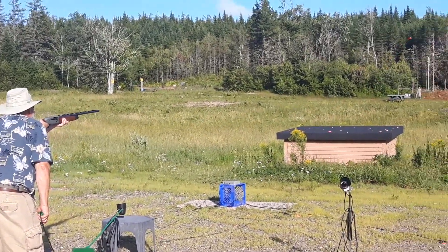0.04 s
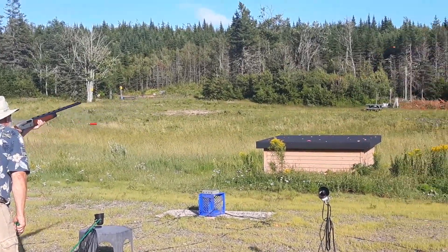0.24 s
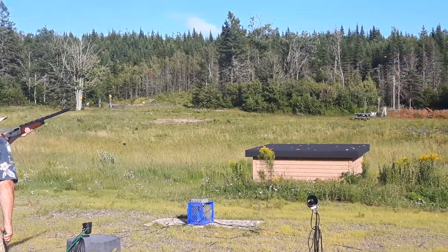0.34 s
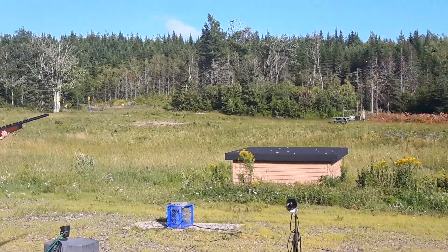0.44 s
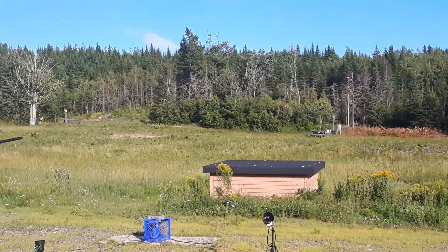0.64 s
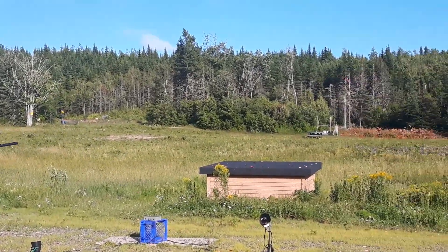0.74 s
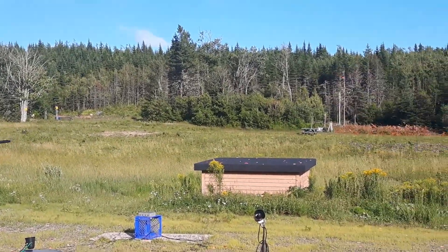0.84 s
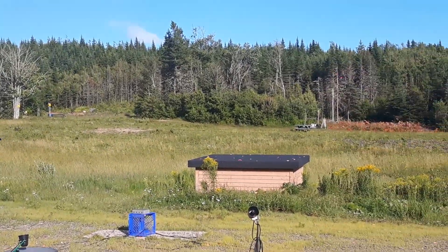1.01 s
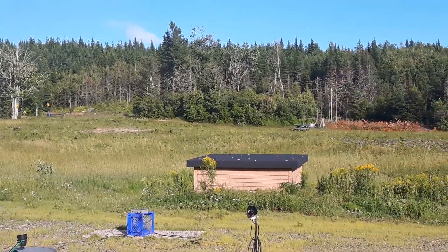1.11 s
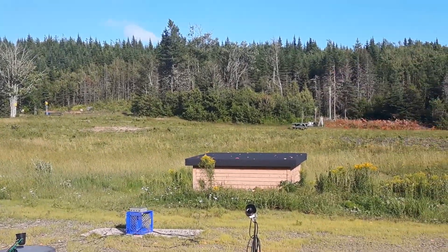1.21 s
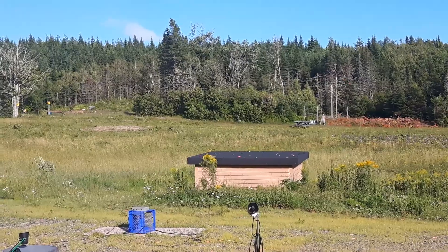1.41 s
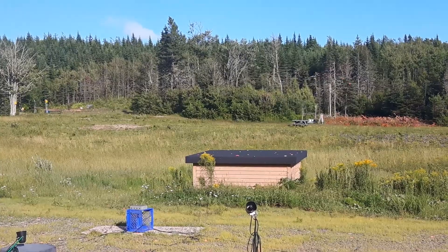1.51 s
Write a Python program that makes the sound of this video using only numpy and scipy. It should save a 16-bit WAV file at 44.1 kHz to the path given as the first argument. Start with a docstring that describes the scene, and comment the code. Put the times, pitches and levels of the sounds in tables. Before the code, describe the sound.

One sharp shotgun shot cracks across an open range and echoes off the forest.

```python
"""Shotgun on an open range

One shot, heard from a few steps behind the shooter. The blast overloads the microphone.
Hard slaps and scattered echoes bounce back from the ground and nearby structures.
Then the forest edge returns a long rolling echo that grows duller, over a faint low hum."""
import sys
import numpy as np
from scipy import signal
from scipy.fft import rfft, irfft, next_fast_len
from scipy.io import wavfile

SR = 44100
rng = np.random.default_rng(int(sys.argv[2]) if len(sys.argv) > 2 else 0)


def generate_wav(sig):
    """Save sig (samples, or channels by samples) to the path in sys.argv[1] as 16-bit PCM at SR."""
    pcm = np.round(np.clip(np.atleast_2d(sig).T, -1, 1) * 32767).astype(np.int16)
    wavfile.write(sys.argv[1], SR, pcm)


N = 68355
T = np.arange(N) / SR
SHOT_S, ATTACK_S = 0.233, 0.00039


def from_db(db):
    """Turn decibels into a number to multiply by."""
    return 10 ** (np.asarray(db) / 20)


def unit_level(x):
    """Scale a signal to an average power of 1."""
    return x / np.sqrt(np.mean(x ** 2) + 1e-20)


def colour(x, points):
    """Filter a sound to follow (f/Hz, level/dB) points; only the gaps between the levels count."""
    size = 2 * next_fast_len(N)
    hz, db = np.transpose(points)
    grid_hz = np.linspace(1, SR / 2, size // 2 + 1)
    gain = unit_level(from_db(np.interp(np.log(grid_hz), np.log(hz), db)))
    # make the filter ring only after a sound, never before it
    cepstrum = irfft(np.log(gain))
    cepstrum[1:size // 2] *= 2
    cepstrum[size // 2 + 1:] = 0
    return irfft(rfft(x, size) * np.exp(rfft(cepstrum)))[:N]


def keep_side(x, hz, side):
    """Keep the "low" or "high" side of a sound."""
    return signal.sosfilt(signal.butter(2, hz, side, fs=SR, output="sos"), x)


def drift(rate_hz):
    """A slow random wobble, about 1 in size."""
    return unit_level(keep_side(rng.standard_normal(2 * N), rate_hz, "low")[N:])


def echoes(per_s, spread_db=1.5):
    """Many tiny echoes of uneven strength, at random times."""
    sizes = from_db(spread_db * np.minimum(rng.exponential(1, N), 4))
    signs = rng.choice([-1, 1], N)
    return unit_level(sizes * signs * (rng.random(N) < per_s / SR))


def die_away(x, start_s, fall_db_per_s, air_db_per_s_khz):
    """Later echoes have gone further: they are weaker, and the air has soaked up their treble."""
    hz, s, frames = signal.stft(x, SR, nperseg=512)
    khz = hz[:, None] / 1000
    loss_db = (fall_db_per_s + air_db_per_s_khz * khz) * np.maximum(s - start_s, 0)
    loss_db += 5.5 * khz * np.maximum(s - 1.09, 0)   # faster once the deepest trees have answered
    return signal.istft(frames * from_db(-loss_db), SR)[1][:N]


# tone of the outdoor air: f/Hz, level/dB
AIR_TONE = [(25, -23.5), (60, -11.5), (90, -7.5), (130, 4.5), (180, -13), (370, -16.5), (480, -29.5),
            (800, -30.5), (1300, -36), (2450, -36), (2900, -54), (4800, -54.5), (6000, -62), (15000, -64)]


def background(hum_hz=119, hum_db=-43.5, air_db=-43, dip_db=15, return_db_per_s=5):
    """Outdoor rumble and a wavering hum; both drop at the shot and creep back."""
    phase = 2 * np.pi * np.cumsum(hum_hz + 2 * drift(5.4)) / SR
    hum = unit_level(np.sin(phase) * from_db(0.5 * drift(10)))
    air = colour(rng.standard_normal(N), AIR_TONE)
    age = T - SHOT_S
    dip = from_db((age > 0) * (return_db_per_s * age - dip_db))
    return dip * (from_db(hum_db) * hum + from_db(air_db) * air)


def shock_train(fronts, envelope):
    """A burst of ragged pressure jumps, evened out to hold every frequency alike."""
    burst = fronts * envelope
    for _ in range(4):
        spectrum = rfft(burst)
        burst = irfft(spectrum / (np.abs(spectrum) + 1e-12), len(burst)) * np.sqrt(envelope)
    return burst


# the blast and its hard echoes: t/s, length/s, level/dB, extra low roar/dB, extra high fizz/dB
CRACK_ARRIVALS = [(0.233, 0.0058, -4, 0.5, -3), (0.2397, 0.0093, -19, 3, 7.5), (0.2549, 0.006, -11.5, 7, 0),
                  (0.274, 0.02, -28, 11, 8), (0.3039, 0.0026, -8, -1, -3), (0.3175, 0.012, -24, 2, -12),
                  (0.3426, .0042, -15, -10.5, -2.5), (.3550, 0.011, -29.5, -17.5, -8),
                  (0.435, 0.0089, -37, -23, -6), (0.448, 0.013, -35, -14, -10),
                  (0.468, 0.011, -37.5, -37, -23), (0.667, 0.0025, -36.5, -8, -17),
                  (0.7012, 0.013, -41, 15, -38)]
# tone of the crack: f/Hz, level/dB
CRACK_TONE = [(35, -28), (150, -8.5), (420, -6), (560, -1), (740, 1.5), (880, -7), (1120, -3.5),
              (1500, -12.5), (2150, -4.5), (2290, -1.5), (2480, -3), (2850, -25), (3600, -16.5),
              (4700, -18), (5600, -31.5), (7200, -30), (9500, -24.5), (11500, -32), (14500, -19.5)]


def cracks(release_s=0.0019, roar_hz=900, fizz_hz=5630):
    """The blast and its echoes repeat one shock, each in its own tone; together they sound hollow."""
    out, age = np.zeros(N), T[:SR // 10]
    fronts = rng.standard_normal(len(age))
    hz, base_db = np.transpose(CRACK_TONE)
    for s, length, db, roar_db, fizz_db in CRACK_ARRIVALS:
        tone_db = base_db + roar_db / (1 + (hz / roar_hz) ** 4) + fizz_db / (1 + (fizz_hz / hz) ** 4)
        envelope = np.minimum(age / ATTACK_S, 1) * np.exp(-np.maximum(age - length, 0) / release_s)
        burst = unit_level(colour(shock_train(fronts, envelope), np.transpose([hz, tone_db])))
        burst *= np.sqrt(np.sum(envelope ** 2) / N)   # longer bursts carry more energy
        start = int(s * SR)
        out[start:] += from_db(db) * burst[:N - start]
    return out


# low thumps of the blast and its echoes off big surfaces: t/s (the middle), f/Hz, level/dB
PRESSURE_SWINGS = [(0.2403, 129, -6), (.3090, 242.2, 3), (0.3272, 251, -19.5), (.3430, 179, -13.5),
                   (0.3701, 210, -20.5), (0.3886, 195, -19.5), (0.4562, 205, -24.5)]


def thumps(width_cycles=0.64):
    """The air pushes, then sucks back; nothing comes before the blast."""
    out = np.zeros(N)
    for s, hz, db in PRESSURE_SWINGS:
        cycles = (T - s) * hz
        out -= from_db(db) * np.sin(2 * np.pi * cycles) * np.exp(-(cycles / width_cycles) ** 2)
    return out * np.clip((T - SHOT_S) / ATTACK_S, 0, 1)


# tone of the echoes from the ground nearby: f/Hz, level/dB
SCATTER_TONE = [(30, -44.5), (100, -9), (190, -0.5), (340, 1), (480, -11), (750, -11), (1500, -14),
                (2120, -16), (2300, -4), (2480, -12.5), (2850, -27), (4600, -21.5), (6500, -35),
                (9500, -27.5), (11500, -30), (14000, -23.5)]


def near_scatter(db=-22.5):
    """Gravel, grass and huts scatter the blast for a few tenths of a second."""
    wash = colour(echoes(per_s=5000) * (T > SHOT_S), SCATTER_TONE)
    return from_db(db) * die_away(wash, SHOT_S, fall_db_per_s=79, air_db_per_s_khz=2)


# tone of the echo from the bushes: f/Hz, level/dB
BUSH_TONE = [(30, -28.5), (200, 3.5), (600, -8.5), (1100, -6.5), (1700, -5), (2400, 1), (2950, -15.5),
             (4600, -7), (5800, -35), (9000, -23), (15000, -48)]


def bushes(start_s=0.495, rise_s=0.051, db=-45.5):
    """Bushes in front of the forest send back a faint, rustling early echo."""
    rise = np.clip((T - start_s) / rise_s, 0, 1)
    rustle = colour(echoes(per_s=2400) * rise, BUSH_TONE)
    return from_db(db) * die_away(rustle, start_s, fall_db_per_s=19, air_db_per_s_khz=7.5)


# tone of the echo from the forest edge: f/Hz, level/dB
FOREST_TONE = [(30, -31), (80, -11.5), (170, -6), (330, -10.5), (460, -9.5), (580, 0.5), (760, 2),
               (950, -9), (1500, -8), (2050, -8), (2400, -4.5), (2950, -24), (4600, -24), (5800, -39.5),
               (9000, -45.5), (15000, -49)]


def forest(start_s=0.6505, rise_s=0.01, db=-37.5, roll_db=0.77, roll_hz=30):
    """Countless tree trunks return the shot as a rolling wash."""
    age = np.maximum(T - start_s, 0)
    front_db = np.exp(-age / 0.028)   # the first rows of trees answer up to 1 dB louder
    level = np.minimum(age / rise_s, 1) * from_db(db + front_db + roll_db * drift(roll_hz))
    wash = colour(echoes(per_s=2400) * level, FOREST_TONE)
    return die_away(wash, start_s, fall_db_per_s=11, air_db_per_s_khz=8)


# tone of the tick: f/Hz, level/dB
TICK_TONE = [(3200, -10), (4450, 3.5), (5500, -15), (9000, -15.5), (12000, -27), (15000, -18)]


def tick(start_s=0.908, decay_s=0.0028, db=-42.5):
    """One light, bright click close by."""
    envelope = (T > start_s) * np.exp(-np.abs(T - start_s) / decay_s)
    return from_db(db) * colour(rng.standard_normal(N) * envelope, TICK_TONE)


# low swells of the far echo: t/s (the loudest point), width/s, f/Hz, level/dB
FAR_SWELLS = [(.975, 0.06, 68, -51.5), (1.03, 0.06, 138, -52), (1.28, 0.043, 106, -47)]


def rumbles(width_octaves=0.67):
    """The bass of the echo rolls back from far away in a few slow swells."""
    out = np.zeros(N)
    edge_ratio = 2 ** (width_octaves / 2)
    for s, width, hz, db in FAR_SWELLS:
        lows = keep_side(rng.standard_normal(N), hz * edge_ratio, "low")
        band = keep_side(lows, hz / edge_ratio, "high")
        out += from_db(db) * unit_level(band) * np.exp(-((T - s) / width) ** 2)
    return out


def scene():
    """The shot, its echoes and the open air, added into one channel."""
    shot = cracks() + thumps() + near_scatter() + bushes() + forest() + rumbles()
    return (shot + tick() + background())[None]


def record(dry, ceiling=0.86, cutoff_hz=15500):
    """The overloaded microphone rounds off the loudest peaks; the highest treble is cut."""
    squashed = ceiling * np.tanh(dry / ceiling)
    return signal.sosfilt(signal.ellip(10, .1, 80, cutoff_hz, fs=SR, output="sos"), squashed)


dry = scene()
out = record(dry)
generate_wav(out)
```